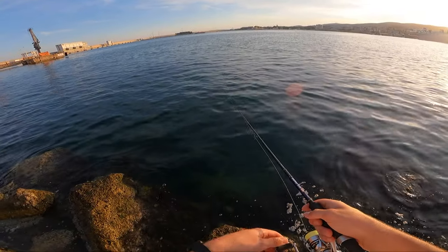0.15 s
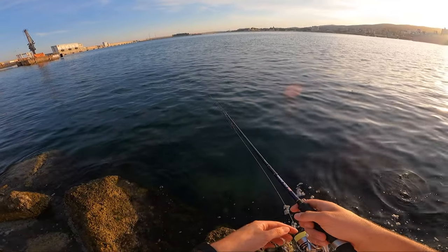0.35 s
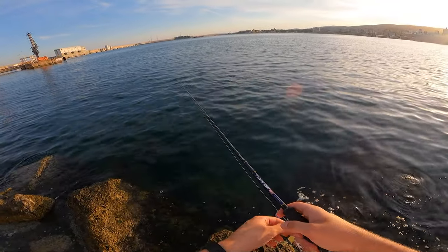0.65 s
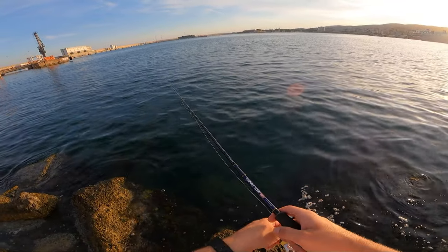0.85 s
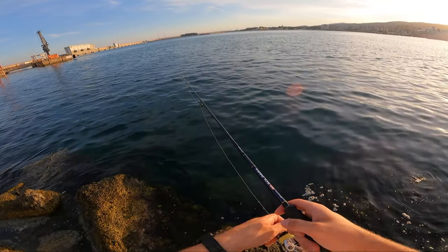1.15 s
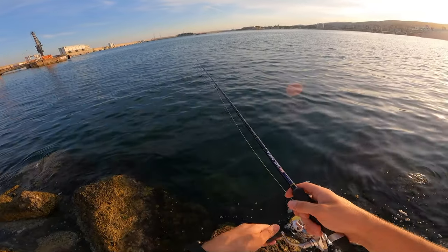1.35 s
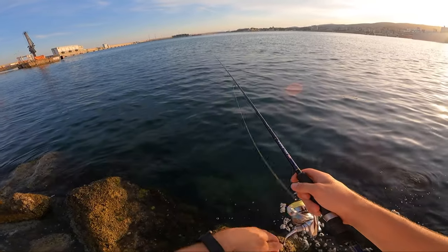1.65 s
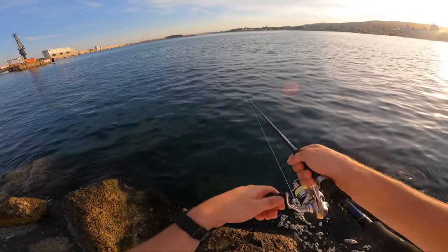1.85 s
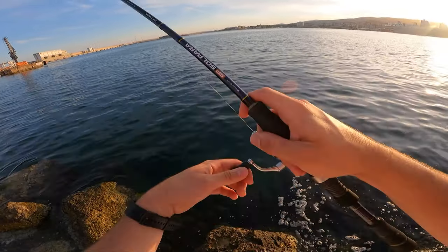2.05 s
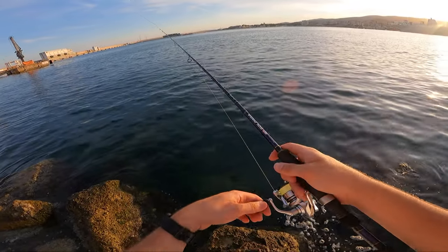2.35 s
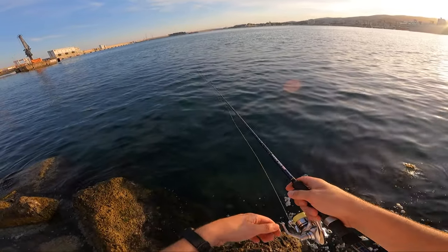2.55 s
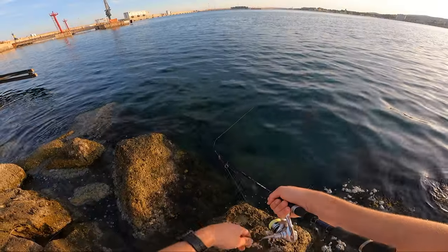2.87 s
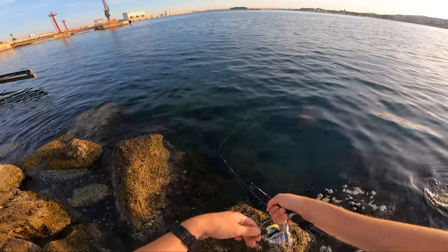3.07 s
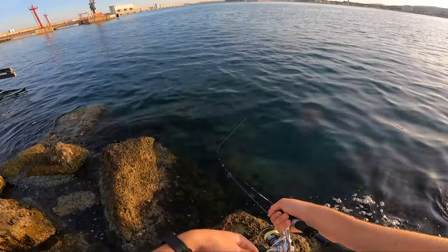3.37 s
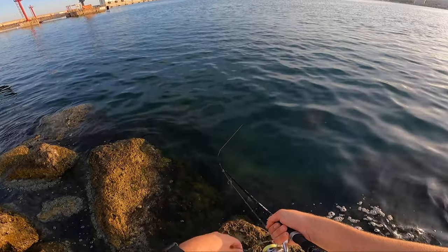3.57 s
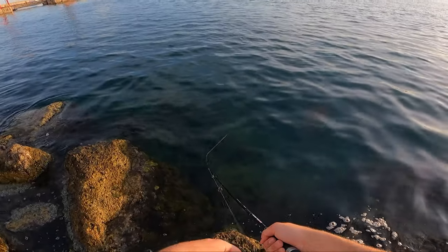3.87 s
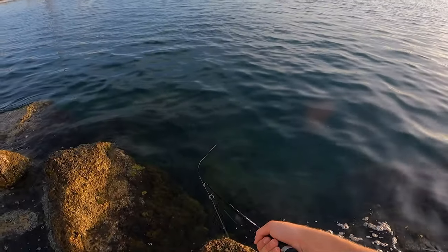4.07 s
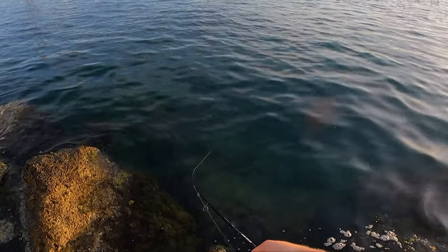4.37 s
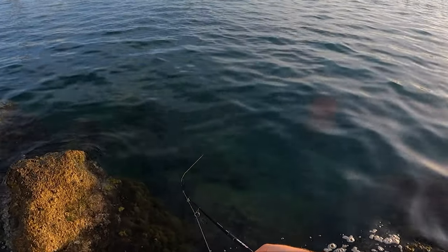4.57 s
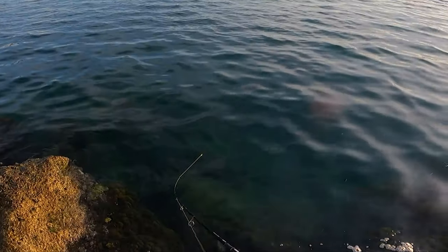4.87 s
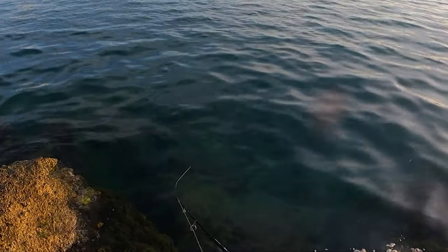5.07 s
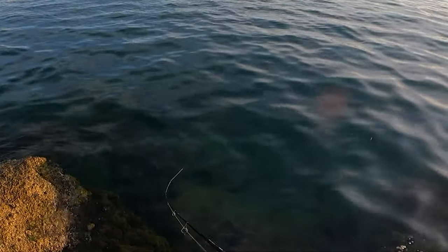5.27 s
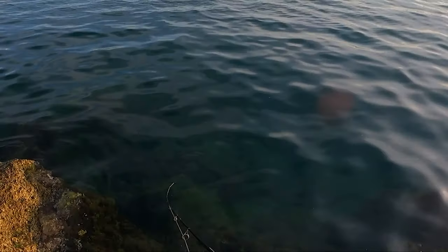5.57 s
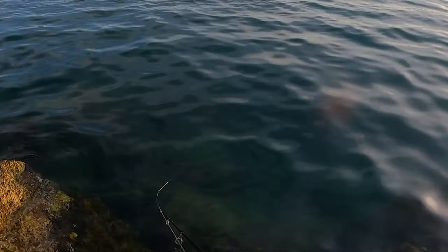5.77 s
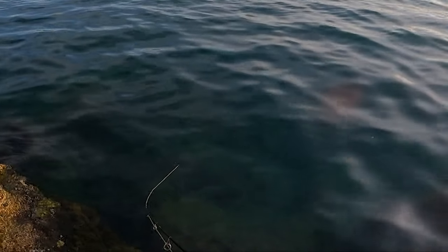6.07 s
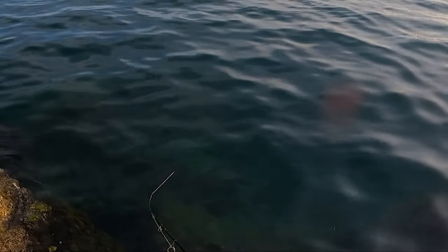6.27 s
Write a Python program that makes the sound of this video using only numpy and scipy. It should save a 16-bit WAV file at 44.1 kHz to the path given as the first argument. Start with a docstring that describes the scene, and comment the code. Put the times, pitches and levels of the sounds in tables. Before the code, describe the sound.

Small waves lap at nearby rocks from the start, a light slap and bubbly plops in the first half second, under a hollow wind gust and low, beating rumble of distant ship engines. Around 0.7 to 1.25 s tackle ticks drily; a deeper plop comes at 1.3 s, then gurgling wavelets and a splashier, foamy wash near 2.0 to 2.3 s as the wind gusts again. After a quieter moment, a sharp dry click at 2.85 s abruptly shifts the background. From there a spinning reel winds continuously, a faint narrow whirr wavering in pitch and speed. Water stays sparse until 3.4 s, then strong bright slaps come at 4.1 and 4.35 s, followed by rounded plops and small ticks through 5.4 s. A crisp slap near 5.97 s leads into fizzing, crackling foam and drops until the end at about 6.4 s.

```python
"""Small waves lap at harbour rocks: each lap rings a cluster of trapped air bubbles, throws noisy spray
and leaves crackling foam made of many small bubble rings. Tackle ticks as an angler handles the rod.
At a dry click the scene changes abruptly; from then on a spinning reel winds: a narrow-band gear whirr
of wandering pitch, with noise ringing the reel's body. Behind lie filtered-noise wind and the beating
tones of ship diesels, both with other levels after the click."""
import sys
import numpy as np
from scipy import signal
from scipy.fft import rfft, irfft
from scipy.io import wavfile
from scipy.ndimage import uniform_filter1d

SR = 44100
rng = np.random.default_rng(int(sys.argv[2]) if len(sys.argv) > 2 else 0)


def master_out(mix):
    """Clip the mix to full scale and print it as 16-bit PCM to the path in sys.argv[1]."""
    frames = np.transpose(np.atleast_2d(mix))
    ceiling = np.clip(frames, -1, 1)
    pcm = np.round(ceiling * 32767).astype(np.int16)
    wavfile.write(sys.argv[1], SR, pcm)


N = 283122
T = np.arange(N) / SR  # t/s

# Levels in the tables are source levels, ahead of mixing trims, panning and the final filtering.
# Water slapping the rocks: [t/s, impact level/dB, bubble f/Hz, contact time/s, spray level/dB]
SLAPS = [(0.045, -34, 1300, 0.016, -58), (0.481, -35, 895, 0.004, -64.5), (1.275, -27, 700, .013, -43),
         (1.427, -30, 760, 0.0073, -65.5), (1.631, -27.5, 950, 0.0038, -53),
         (1.997, -30, 1500, .018, -53.5), (2.127, -32.5, 1150, 0.035, -50.5),
         (2.212, -28.5, 1760, 0.035, -54.5), (3.521, -35, 835, 0.006, -49.5),
         (3.685, -33.5, 1150, .012, -65), (3.753, -32.5, 1150, .035, -65.5),
         (4.089, -17.5, 1360, 0.00195, -58), (4.096, -17.5, 1740, .003, -48), (4.339, -27, 850, .01, -65),
         (4.348, -18, 1090, 0.011, -58), (4.634, -34.5, 1530, 0.0064, -47.5),
         (5.032, -29, 1900, 0.004, -58), (5.093, -28, 1150, .008, -66.5), (5.653, -28, 1200, 0.015, -54),
         (5.794, -31, 950, 0.0059, -62), (5.823, -29, 1000, .012, -64), (5.898, -26.5, 1300, 0.007, -55),
         (5.963, -26.5, 850, 0.035, -50.5), (5.972, -18.5, 950, .005, -58), (6.094, -36, 3400, .026, -49),
         (6.172, -30.5, 1500, .008, -53), (6.325, -31.5, 1590, 0.019, -44.5)]
# Single bubbles: [t/s, f/Hz, level/dB, ring length/cycles of the starting pitch, rise of pitch/share]
PLOPS = [(.06, 5430, -38, 49, .1), (0.073, 970, -31, 22, 0.17), (.128, 2300, -46, 20, 0.2),
         (.27, 3400, -44, 32, .1), (.19, 1880, -39, 17, .2), (.691, 1600, -35, 18, 0.088),
         (0.7848, 2980, -36, 18, .1), (.809, 3040, -44, 46, 0.29), (1.269, 1830, -31.5, 35, 0.092),
         (1.277, 460, -21.5, 8.9, 0.083), (1.35, 3600, -41.5, 40, .15), (1.435, 1110, -30.5, 42, 1.05),
         (1.941, 2900, -36, 22, .1), (2.151, 4100, -32.5, 32, .1), (2.24, 2140, -32, 29, .15),
         (3.341, 1370, -29.5, 20, 0.1), (3.365, 1740, -34.5, 19, .2), (3.523, 545, -28, 15, .2),
         (3.543, 1550, -38, 34, .35), (3.69, 1650, -33, 16, .1), (3.785, 1320, -36, 23, .3),
         (4.025, 656, -32.5, 20, 0.37), (4.052, 945, -25, 30, 0.31), (4.172, 4920, -34, 37, .1),
         (4.26, 2150, -33, 18, .2), (4.311, 814, -28, 18, 0.22), (4.347, 986, -22.5, 22, 0.24),
         (4.451, 920, -30, 13, .2), (4.502, 1190, -34, 35, 0.55), (4.694, 600, -30.5, 14, 0.14),
         (4.771, 730, -33, 13, 0.27), (4.873, 5700, -24, 18, 0.28), (4.884, 1240, -31, 14, .2),
         (5.007, 686, -27, 10, .1), (5.032, 870, -28, 13, 0.23), (5.098, 500, -33, 13, 1.15),
         (5.213, 925, -31.5, 20, 0.2), (5.231, 577, -33, 27, 1.05), (5.291, 742, -29.5, 36, 0.49),
         (5.339, 1410, -31, 30, .3), (5.374, 1580, -37.5, 91, 0.5), (5.418, 1130, -35, 31, 0.17),
         (5.898, 4330, -33.5, 44, .1), (5.987, 1070, -28, 33, 0.085), (6.105, 3320, -28.5, 29, .2),
         (6.117, 2100, -30, 36, 0.42), (6.335, 3770, -33, 25, .1)]
# Spectra of the water sheet and of its droplets: [f/Hz, relative level/dB]
SHEET_COLOUR = [(200, -3.5), (450, 5.0), (1000, 0), (2100, -7.5), (3200, -23.5), (8000, -37.5)]
DROPLET_COLOUR = [(1500, -17.5), (3500, 0.0), (7200, -4.0), (8300, -8.5), (10500, -10.5), (13000, -26)]
# Wavelets running in between the rocks: [crest t/s, length/s, gurgle level/dB, foam level/dB]
WAVELETS = [(0.058, 0.22, -48.5, -60), (1.43, 0.53, -61, -58), (1.605, 0.35, -48.5, -56.5),
            (2.006, 0.38, -45.5, -54), (2.0, 0.06, -48, -53), (2.152, 0.071, -52, -47.5),
            (2.222, 0.047, -45, -48.5), (3.36, 0.2, -50, -55), (4.077, 0.086, -60, -50),
            (4.285, 0.16, -46.5, -56.5), (4.523, 0.097, -48.5, -58), (4.883, 0.36, -50.5, -60.5),
            (5.302, 0.18, -47.5, -57.5), (5.976, 0.17, -47, -52), (6.115, 0.13, -47.5, -50),
            (6.28, 0.25, -48, -56.5)]
# Trickle between wavelets: [t/s, gurgle level/dB, foam level/dB]
TRICKLE = [(0, -56.5, -72), (2.7, -61, -67), (4.2, -60, -60.5), (6.42, -54, -60.5)]
# Spectrum of the foam: [f/Hz, relative level/dB]
FOAM_COLOUR = [(1200, -16.5), (2200, 5), (3500, 0.5), (5500, 2.5), (7400, -3), (8300, -10), (11500, -10),
               (14000, -31)]
# Tail scattered by the rocks: [f/Hz, level/dB]
ROCK_COLOUR = [(1500, -10.0), (7000, -11.0)]
# Sharp ticks of tackle and bursting drops: [t/s, level/dB]
TICKS = [(0.721, -39.5), (1.003, -45.5), (1.129, -34.5), (1.176, -36), (1.194, -40.5), (1.241, -48),
         (1.558, -42), (1.59, -40), (2.088, -32.5), (2.338, -49), (3.263, -36), (4.457, -36.5),
         (4.637, -33), (4.837, -38), (4.875, -34.5), (5.915, -38), (5.958, -37), (6.274, -37)]
# Speed of the winding as the rate of the gear teeth: [t/s, f/Hz]
GEAR = [(2.86, 2060), (2.94, 2210), (3.01, 2480), (3.05, 2860), (3.14, 2910), (3.22, 2560), (3.36, 2610),
        (3.43, 2900), (3.49, 2900), (3.55, 2430), (3.73, 2390), (3.8, 2540), (3.99, 2350), (4.2, 2360),
        (4.29, 2560), (4.37, 2340), (4.54, 2420), (4.63, 2760), (4.72, 2420), (4.86, 2500), (4.99, 2800),
        (5.06, 2490), (5.24, 2640), (5.29, 2510), (5.4, 2580), (5.52, 2400), (5.71, 2420), (5.79, 2680),
        (5.86, 2480), (6.02, 2650), (6.18, 2880), (6.27, 2470), (6.42, 2560)]
# Resonances of the reel's body: [f/Hz, width/Hz, relative level/dB]
REEL_MODES = [(1664, 360, -3), (2490, 150, -4.5), (2726, 170, -2.5), (2885, 100, -4), (4710, 360, -9),
              (5220, 420, -10.5), (6450, 750, -11.5)]
# Gusts: [crest t/s, rush level/dB, length/s]
GUSTS = [(0.06, -38, 0.3), (1.068, -44.5, 0.28), (1.424, -49.5, 0.3), (1.89, -38, 0.67),
         (2.154, -37, 0.051), (2.812, -48.5, 0.26)]
# Wind rumble: [t/s, level/dB]
RUMBLE = [(0, -33.5), (2.2, -33.5), (2.4, -37), (3.6, -37.5), (4.3, -34.5), (5.2, -36.5)]
# Spectra of wind and far harbour, before and during the winding: [f/Hz, relative level/dB]
AIR_BEFORE = [(40, -18), (70, 0.5), (139, -7), (201, -14), (344, -18.5), (590, -27.5), (780, -39),
              (1080, -38), (3160, -60), (7300, -74), (8300, -69), (11000, -74), (14000, -99)]
AIR_DURING = [(40, -19), (70, -8), (101, -6), (139, -10.5), (278, -18.5), (340, -20), (720, -40),
              (980, -39), (1500, -44), (2200, -45), (3440, -53), (7300, -85), (8300, -62), (11000, -71),
              (14000, -97)]
# Spectrum of the hollow rush, and gain of the side signal of the wind: [f/Hz, relative level/dB]
RUSH_COLOUR = [(150, -23.5), (320, -1.5), (440, 2), (580, -5), (800, -26.0), (1080, -13.5),
               (2000, -39.0), (5000, -56.5)]
SIDE_COLOUR = [(60, -12.5), (130, -26.0), (300, -16.5), (600, -14.5), (1200, -8.5), (8000, -4.0)]
# Diesel lines: [f/Hz]
DIESEL_HZ = [25.8, 34.7, 39.7, 44.6, 52.4, 57.2, 59.9, 87.5, 101, 120.2]
# Their mean levels: [level before the winding/dB, level during it/dB]
DIESEL_DB = [(-45.5, -40.5), (-36.5, -31.5), (-37, -31), (-36.5, -41.5), (-47, -31), (-49, -31.5),
             (-36, -39.5), (-45.5, -45), (-44, -52.5), (-44, -54)]
# The low hum that comes and goes: [t/s, level/dB]
HUM = [(0, -34.5), (.65, -36), (.9, -40.5), (2.8, -46), (3.6, -39.5), (4.5, -43), (5.9, -44.5)]
# Harbour machinery: [f/Hz, width/Hz, level/dB]
DRONES = [(162.4, 32, -44.5), (238.5, 7, -51), (335.9, 8, -52.5), (708, 9.3, -65), (945, 51, -66)]
# Response of the ports: [f/Hz, gain/dB]
PORT_COLOUR = [(10, -11), (25, 0.5), (7500, -0.5), (8300, -2.5), (12000, -7.0), (14000, -16.0)]

WINDING_S = 2.8525  # the click; the reel winds from here on, t/s
CREST_SHARE = 0.42  # sets the build-up time of a swell; the rest sets its decay
TICK_HZ = 4950  # centre of the ticks' ring, scattered from tick to tick
COAST_HZ = 2400  # tooth rate at an easy pace
WHIRR_DB, WHIRR_DB_PER_HZ = -59.3, .002  # teeth: level at the easy pace, growth with tooth rate
RUB_DB, RUB_DB_PER_HZ = -61, 0.0029  # the same for their rubbing
BREEZE_DB = -53.5  # rush between gusts
HUM_HZ, HUM_WIDTH_HZ = 125, 14
TOP_HZ = 15000  # edge of the final low-pass


def laps():
    """Bubble resonance and impact noise: slaps ring clusters of bubbles and throw spray; bubbles plop."""
    out, spray, smack = np.zeros((2, N)), np.zeros(N), np.zeros(N)
    for s, db, hz, length, spray_db in SLAPS:
        side = rng.uniform(-.2, .2)
        # the strongest bubble rings right at the impact; weaker ones, higher or lower, crowd after it
        add(out, s, undb(db - 3) * bubble(hz, 4.7, 0.16), side)
        for when, pitch, size, pan in rng.random((18, 4)):
            ring = bubble(hz * 2 ** (2.2 * (pitch - .5)), 5.2, 0.22)
            ring = ring * undb(db - 7.0 - 10 * size)
            add(out, s + length * when ** 1.5, ring, side + 0.74 * (pan - .5))
        contact_s = [0, .003, length, 1.61 * length + 0.0028]
        contact = np.interp(T - s, contact_s, [0.0063, 0.53, 0.5, 0.011])
        spray += undb(spray_db) * contact
        smack += undb(db - 12.0) * contact
    for s, hz, db, cycles, rise in PLOPS:
        side = rng.uniform(-0.18, 0.22)
        add(out, s, undb(db) * bubble(hz, cycles, rise), side)
        # fainter companions of nearby pitch
        for when, pitch, size in rng.random((7, 3)):
            ring = bubble(hz * (.8 + .9 * pitch), 14, 0.19)
            add(out, s + 0.046 * when, undb(db - 12.5 - 17 * size) * ring, side)
    splash = stereo(rng.standard_normal(N), 0.55 * rng.standard_normal(N)) * undb(5.26 * walk(400))
    # the sheet of water smacks low, its droplets hiss high
    sheet = unit(colour(splash, SHEET_COLOUR))
    droplets = unit(colour(splash, DROPLET_COLOUR))
    return out + smack * sheet + spray * undb(-1.5) * droplets


def bubble(hz, cycles, rise):
    """Damped resonance: the ring swells as the bubble pinches off and climbs as it nears the surface."""
    age = np.arange(int(cycles * SR / hz) + 2) * hz / SR / cycles  # 0 to 1 over the ring
    size = 1.036 * (1 - np.exp(-age / 0.071)) * np.exp(-np.log(100) * age)
    return size * np.sin(2 * np.pi * cycles * age * (1 + rise * age / 2))


def bubble_cloud(per_s, low_hz, high_hz, cycles, spread_db):
    """Random superposition: bubbles ring at random moments, many faint and a few strong."""
    out = np.zeros((2, N))
    for when, size, pitch, life, pan in rng.random((int(per_s * N / SR), 5)):
        ring = bubble(low_hz * (high_hz / low_hz) ** pitch, cycles * (.5 + life), .5 * life)
        strength = undb(-spread_db * np.log(size + 0.006))
        add(out, when * N / SR, ring * strength, 1.3 * (pan - .5))
    return unit(out)


def wash():
    """Superposed bubble rings: wavelets gurgle as they drain, drops patter, foam fizzes, crackles, hisses."""
    gurgle_level, foam_level = undb(curves(TRICKLE))
    for s, length, gurgle_db, foam_db in WAVELETS:
        flow = swell(s, length)
        # independent noises add in power
        gurgle_level = np.hypot(gurgle_level, undb(gurgle_db) * flow)
        foam_level = np.hypot(foam_level, undb(foam_db) * flow)
    gurgle = bubble_cloud(per_s=240, low_hz=680, high_hz=2100, cycles=14, spread_db=3.4)
    fizz = bubble_cloud(per_s=280, low_hz=2020, high_hz=9020, cycles=22, spread_db=2.0)
    crackle = bubble_cloud(per_s=45, low_hz=6080, high_hz=12200, cycles=14, spread_db=3.5)
    hiss = stereo(rng.standard_normal(N), .5 * rng.standard_normal(N)) * undb(5.6 * walk(50))
    foam = unit(colour(fizz + undb(1.0) * crackle + hiss, FOAM_COLOUR))
    # falling drops land in bunches, each a very short ring
    patter = bubble_cloud(per_s=200, low_hz=1000, high_hz=6000, cycles=6, spread_db=3.6)
    patter = unit(patter * undb(3.4 * walk(45)))
    foam_and_patter = foam * undb(-2.5) + patter * undb(-3)
    return gurgle * gurgle_level * undb(-2.0) + foam_and_patter * foam_level


def swell(s, length):
    """Rise and relaxation: a Gaussian climb to height 1 at time s, then an exponential draining away."""
    age = (T - s) / length
    return np.exp(-np.where(age < 0, (age / CREST_SHARE) ** 2, age / (1 - CREST_SHARE)))


def rocks(x):
    """Diffuse scattering: nearby boulders add a short, faint, dull tail."""
    age = T[:SR // 4]
    tail = rng.standard_normal((2, len(age))) * np.exp(-np.log(1000) * age / 0.11)
    tail /= np.sqrt(np.sum(tail ** 2, axis=1, keepdims=True))
    scattered = signal.fftconvolve(x, tail, axes=1)[:, :N]
    return x + colour(scattered, ROCK_COLOUR)


def reel(winding):
    """Gear meshing: teeth whirr higher and louder with speed and flare at body modes; rubbing rings these."""
    hz, = curves(GEAR)
    faster_hz = hz - COAST_HZ
    # uneven teeth make the pitch shake
    hz = hz * (1 + .014 * walk(70))
    teeth = rough_line(hz, 150)
    teeth = unit(teeth + .5 * sum(undb(gain) * band(teeth, f, w) for f, w, gain in REEL_MODES))
    # the load on the gears comes and goes
    whirr = unit(teeth * undb(2.2 * walk(45)))
    # a slightly eccentric rotor presses the teeth together once every 46 of them
    rotor = np.cumsum(hz) / SR / 46
    rub = stereo(rng.standard_normal(N), 0.39 * rng.standard_normal(N))
    rub = rub * undb(4.2 * walk(120) + 2.4 * np.cos(2 * np.pi * rotor))
    body = sum(undb(gain) * unit(band(band(rub, f, w), f, w)) for f, w, gain in REEL_MODES)
    whirr_level = undb(WHIRR_DB + WHIRR_DB_PER_HZ * faster_hz)
    rub_level = undb(RUB_DB + RUB_DB_PER_HZ * faster_hz)
    return winding * (whirr * whirr_level + body * rub_level)


def dry_click():
    """Step and decay: a sharp click where the scene changes abruptly, a step that decays exponentially."""
    out = np.zeros((2, N))
    add(out, WINDING_S, -undb(-18) * np.exp(-T[:SR // 10] / 0.0038), 0)
    return out


def ticks():
    """Impulse excitation: a tiny crack of decaying noise sets off a brief ring."""
    out, age = np.zeros((2, N)), T[:SR // 10]
    for s, db in TICKS:
        crack = rng.standard_normal(len(age)) * np.exp(-np.log(1000) * age / 0.0066)
        ring = band(crack, TICK_HZ * 2 ** rng.uniform(-0.42, 0.23), 830)
        tick = ring + .5 * band(crack, 5300, 4100)
        add(out, s, undb(db + 2.5) * tick / np.abs(tick).max(), rng.uniform(-0.73, 0.78))
    return out


def wind(winding):
    """Turbulence as filtered noise: a rumble common to both ears, a wide hiss, a hollow rush in the gusts."""
    rumble_db, = curves(RUMBLE)
    gust_power = sum((undb(db) * swell(s, length)) ** 2 for s, db, length in GUSTS)
    gust = np.sqrt(undb(BREEZE_DB) ** 2 + gust_power)
    before = undb(2.0) * unit(colour(wide_noise(), AIR_BEFORE))
    during = undb(-0.5) * unit(colour(wide_noise(), AIR_DURING))
    rush = unit(colour(wide_noise(), RUSH_COLOUR))
    air = before * (1 - winding) + during * winding
    return air * undb(rumble_db) + rush * gust * undb(2.14 * walk(18))


def wide_noise():
    """Partial coherence: noise nearly alike in both ears when low, wider toward the treble."""
    return stereo(rng.standard_normal(N), colour(rng.standard_normal(N), SIDE_COLOUR))


def diesels(winding):
    """Beating: close engine orders interfere over a rumble; a hum and machinery drones lie above."""
    out = undb(-39.5) * unit(band(band(rng.standard_normal(N), 45, 37), 45, 37))
    for hz, (before_db, during_db) in zip(DIESEL_HZ, DIESEL_DB):
        phase = 2 * np.pi * (hz * T + rng.random()) + 0.34 * walk(2.006)
        level_db = before_db + winding * (during_db - before_db) + 1.52 * walk(4.7)
        out += np.sqrt(2) * np.sin(phase) * undb(level_db)
    hum_db, = curves(HUM)
    out += undb(hum_db) * rough_line(HUM_HZ, HUM_WIDTH_HZ)
    return out + sum(undb(db) * rough_line(hz, width) for hz, width, db in DRONES)


def rough_line(hz, width_hz):
    """Random modulation: a tone whose size and phase wander widens to a narrow band."""
    phase = 2 * np.pi * np.cumsum(hz + 0 * T) / SR  # hz may be a number or a curve
    return unit(walk(2 * width_hz) * np.cos(phase) + walk(2 * width_hz) * np.sin(phase))


def walk(rate):
    """Smoothed randomness: held random values, averaged twice, wander with spread 1."""
    k = max(int(SR / rate), 1)
    held = np.repeat(rng.standard_normal(N // k + 1), k)
    return unit(uniform_filter1d(uniform_filter1d(held, k), k)[:N])


def band(x, hz, width_hz):
    """Resonance: one peak with gain 1 at its centre."""
    return signal.lfilter(*signal.iirpeak(hz, hz / width_hz, fs=SR), x)


def colour(x, points):
    """Spectral shaping: a filter drawn through (f/Hz, gain/dB) points on a log frequency axis."""
    hz, db = np.transpose(points)
    f = np.fft.rfftfreq(N, 1 / SR) + 1e-3
    return irfft(rfft(x) * undb(np.interp(np.log(f), np.log(hz), db)), N)


def curves(rows):
    """Linear interpolation: each column of a time table, sample by sample."""
    s, *columns = np.transpose(rows)
    return [np.interp(T, s, c) for c in columns]


def undb(db):
    """Logarithmic level: decibels to amplitude gain."""
    return 10 ** (np.asarray(db) / 20)


def unit(x):
    """Normalisation: scale to rms 1."""
    return x / np.sqrt(np.mean(x ** 2) + 1e-20)


def stereo(mid, side):
    """Sum and difference: left and right from mid and side."""
    return np.array([mid + side, mid - side])


def add(out, s, sound, pan):
    """Superposition: mix a short sound in at time s; positive pan leans left, negative right."""
    i = int(np.clip(s * SR, 0, N - 1))
    part = sound[:N - i]
    out[:, i:i + len(part)] += np.outer([1 + pan, 1 - pan], part)


def scene():
    """Superposition of all sources at the angler's chest."""
    winding = np.clip((T - WINDING_S) / .02, 0, 1)  # 0 before, 1 during
    near_rocks = rocks(laps() + wash() + ticks())
    return near_rocks + reel(winding) + dry_click() + wind(winding) + diesels(winding)


def record(dry):
    """Linear filtering: a slightly louder right port, a softened top and a steep cut."""
    ports = colour(dry, PORT_COLOUR) * undb([[-.25], [.25]])
    return signal.sosfilt(signal.ellip(8, .2, 70, TOP_HZ, fs=SR, output="sos"), ports)


dry = scene()
out = record(dry)
master_out(out)
```